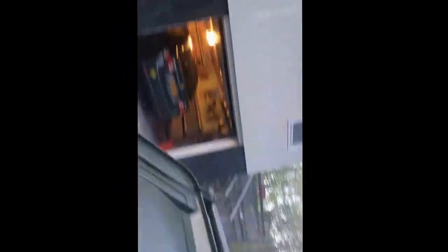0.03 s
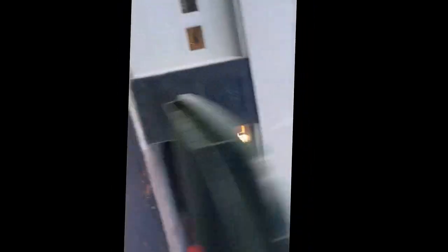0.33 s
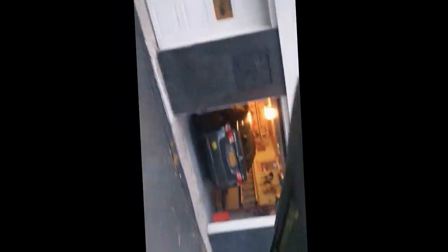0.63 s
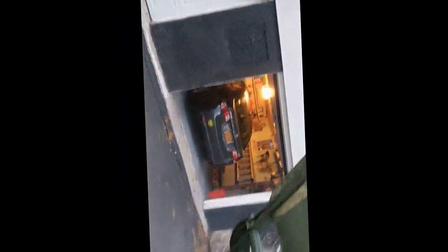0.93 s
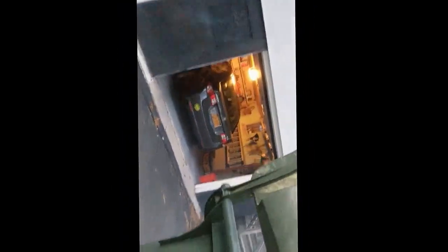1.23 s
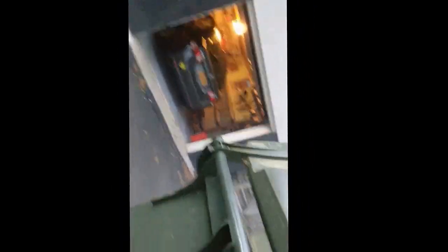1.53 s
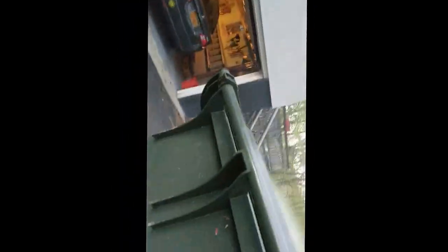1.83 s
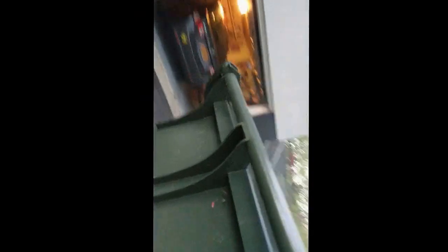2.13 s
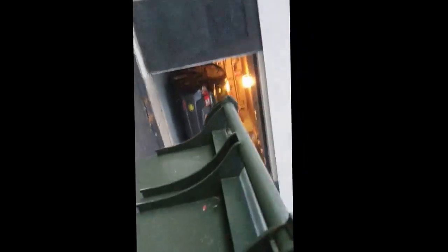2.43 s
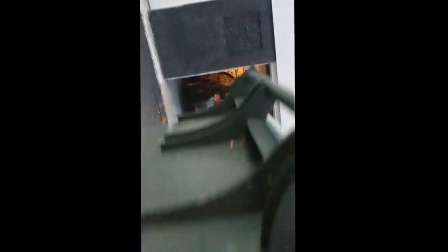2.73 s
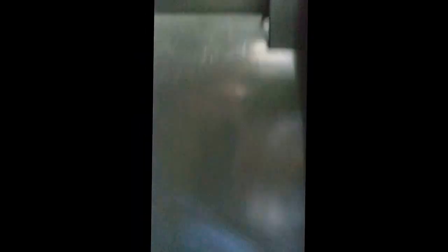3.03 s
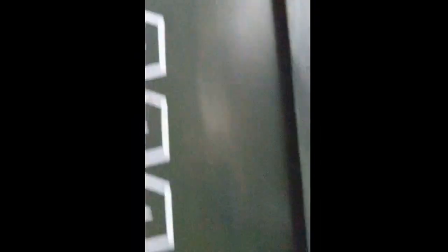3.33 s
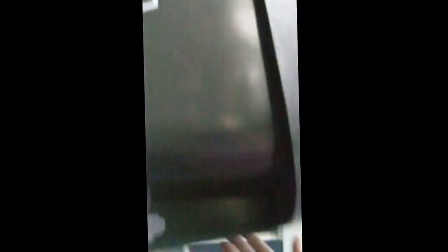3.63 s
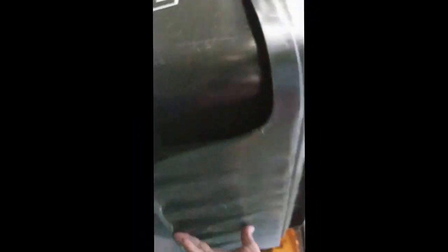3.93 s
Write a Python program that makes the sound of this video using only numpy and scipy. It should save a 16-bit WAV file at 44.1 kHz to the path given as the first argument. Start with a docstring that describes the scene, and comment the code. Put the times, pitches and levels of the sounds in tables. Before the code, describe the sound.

A plastic wheelie bin rolls with a faint low murmur, fading by 1 second amid soft hand rubs and ticks. At about 1.9 seconds its lid slams loudly, clattering and booming with a short echo; a small hollow knock follows at 2.4. From 2.7 until 4 seconds the bin is hauled over rough paving, close by, with a hollow rumble, gritty wheels, rattling jolts and sharp clicks around 3.3.

```python
"""A low murmur of slow wheels comes first: a plastic wheelie bin rolls to a stop in front of a shed.
Its lid slams and clatters, each impact exciting the lid's modes; the air inside booms, the walls
reflect the sound, and one small knock follows. Then the bin is hauled over rough paving: stones
drive the resonances of the hollow body, bumps jolt the axle and a side panel groans.
A hand rubs and ticks on the plastic, over faint outdoor air."""
import sys
import numpy as np
from scipy import signal
from scipy.fft import rfft, irfft, next_fast_len
from scipy.io import wavfile

SR = 44100
rng = np.random.default_rng(int(sys.argv[2]) if len(sys.argv) > 2 else 0)


def persist_wave(psi):
    """Save psi, clipped to +-1, as 16-bit WAV."""
    counts = np.round(np.clip(psi, -1, 1) * 32767).astype(np.int16)
    wavfile.write(sys.argv[1], SR, np.atleast_2d(counts).T)


N = 176400

STONES_PER_S, STONE_SPREAD_DB = 980, 2.5
# bright edge of a jolt or a crackle (frequency [Hz], gain [dB])
EDGE_SPECTRUM = [(500, 7), (2000, 13), (5800, -0.5), (8000, -11), (15000, -17)]


def lid_slam(body_db=-3, modes_db=-8, crack_db=-3, cavity_t60=0.66, cavity_rise_s=0.14):
    """Impact excitation: each contact with the rim cracks and rings; the lid pumps the air inside."""
    # (time [s], relative ring level [dB], relative crack level [dB])
    contacts = [(1.9101, -20.5, -20), (1.9217, -10.5, -3.5), (1.9302, -20.5, -2.5), (1.936, -19.5, 6),
                (1.9544, -17.5, -4), (1.978, -16, -11), (1.993, -18.5, 0), (2.008, -14, -10),
                (2.038, -15, -8.5), (2.0523, -12.5, -0.5)]
    # dense ring of the lid (frequency [Hz], gain [dB])
    body_spectrum = [(25, -63), (45, 1), (70, 1.5), (120, 4), (240, 3), (720, -1.5), (1100, -1.5),
                     (1520, -6.5), (1850, 2), (2120, -1.5), (2400, -8), (3200, -15.5), (4800, -22),
                     (12100, -34), (15500, -69)]
    # its decay, with the walls' answer (frequency [Hz], t60 [s])
    body_decay = [(70, 0.88), (500, 0.49), (2000, 0.51), (4500, 0.63), (8000, 0.086), (14000, 0.16)]
    # crack of a contact (frequency [Hz], gain [dB])
    crack_spectrum = [(100, -8.5), (1000, 12), (2000, 0.5), (5000, -0.5), (8500, -10.5), (12000, -13),
                      (15500, -20)]
    # modes of the enclosed air (frequency [Hz], level [dB])
    cavity_modes = [(67.5, -5), (92.7, -7)]
    body, tones, t = np.zeros(N), np.zeros(N), np.arange(SR) / SR
    for s, db, _ in contacts:
        add(body, s, amp(db) * dense_ring(body_decay))
        add(tones, s, amp(db + modes_db) * lid_ring())
    cavity = sum(amp(db) * np.sin(2 * np.pi * hz * t) for hz, db in cavity_modes)
    swell = amp(-60 * t / cavity_t60) * (1 - np.exp(-t / cavity_rise_s))
    add(tones, contacts[1][0], swell * cavity)
    cracks = coloured(bursts([(s, db) for s, _, db in contacts], t60=0.01), crack_spectrum)
    return amp(body_db) * coloured(body, body_spectrum) + tones + amp(crack_db) * cracks


def lid_ring(detune=0.0224, rise_s=0.0005):
    """Free vibration: a sum of damped modes, which shift from blow to blow as the lid is soft."""
    # (frequency [Hz], relative level [dB], t60 [s])
    lid_modes = [(645, -5, 0.09), (861, -19, 0.6), (1092, -4, 0.08), (1370, -5, 0.053), (1626, -23, 0.43),
                 (1860, -21, 0.45), (2074, -20, 0.46), (3144, -24, 0.42)]
    t = np.arange(SR // 2) / SR
    out = np.zeros(len(t))
    for hz, db, t60 in lid_modes:
        decay = amp(db + rng.normal(0, 1) - 60 * t / t60)
        shifted_hz = hz * (1 + detune * rng.normal())
        out += decay * np.sin(2 * np.pi * shifted_hz * t + rng.uniform(0, np.pi))
    return (1 - np.exp(-(t / rise_s) ** 2)) * out


def hauling(boom_db=-1, walls_db=-2, grit_db=-1, crackle_db=-20.5):
    """Forced vibration: stones shake the hollow, the panels and the wheels; flexing plastic crackles."""
    # relative levels (time [s], bass [dB], low mids [dB], wheel grit [dB])
    haul_levels = [(2.62, -45, -76, -74), (2.70, -26.5, -33.5, -41.5), (2.78, -23, -31, -44),
                   (2.85, -25, -24, -36.5), (2.95, -18, -20.5, -25), (3.15, -21, -19, -29),
                   (3.3, -20, -20.5, -19.5), (3.4, -18, -21, -24.5), (3.75, -19, -21, -29),
                   (4.0, -21, -25.5, -29)]
    # hollow of the bin (frequency [Hz], gain [dB])
    boom_spectrum = [(20, -19), (36, -30), (46, -6), (54, 1), (63, -4.5), (84, -4), (130, -13), (300, -56),
                     (1500, -100)]
    # wheels on grit (frequency [Hz], gain [dB])
    grit_spectrum = [(150, -10.5), (350, -5.5), (850, -4), (1250, -5.5), (1600, -14.5), (2150, -15),
                     (2600, -24), (5500, -34), (8500, -39.5), (15000, -39.5)]
    bass, mids, wheels = curves(haul_levels)
    road = impacts(STONES_PER_S, STONE_SPREAD_DB)
    boom = amp(bass + boom_db) * unit(coloured(road, boom_spectrum))
    walls = amp(mids + walls_db) * wall_panels(road)
    crunch = unit(coloured(clumped_noise(per_s=160, life_s=0.0067, floor=0.32), grit_spectrum))
    crunch += amp(crackle_db) * unit(coloured(impacts(per_s=26, spread_db=5), EDGE_SPECTRUM))
    onset = gate(haul_levels[0][0], length=2, rise_s=0.018, fall_s=1)
    return onset * (boom + walls + amp(wheels + grit_db) * crunch)


def wall_panels(force):
    """Modal superposition: the bin's walls respond as damped resonators of alternating sign."""
    # (frequency [Hz], bandwidth [Hz], relative level [dB])
    panel_modes = [(185.2, 12.4, 0.5), (217, 18.6, -0.5), (247.7, 30, -2.5), (302.5, 25, -5.5),
                   (334.5, 12.5, -5.5), (474, 170, -15)]
    # (frequency [Hz], gain [dB])
    panel_colour = [(70, -18), (170, -2), (450, -0.5), (1500, -20.5), (8000, -44)]

    def response(f):
        return sum((-1) ** k * amp(db) * 1j * f * width / (hz * hz - f * f + 1j * f * width)
                   for k, (hz, width, db) in enumerate(panel_modes))
    return unit(coloured(filtered(force, response), panel_colour))


def jolts(body_db=-9, edge_db=-13, push_db=19):
    """Shock excitation: a bump is one sharp push and a rattle of wheels on the axle; the body thuds."""
    # (time [s], relative level [dB], treble offset [dB])
    shocks = [(0.121, -49, -12), (2.721, -20, -25), (2.815, -20, -12), (2.877, -22.5, 3), (2.908, -19, -7),
              (2.941, -23, 0), (3.052, -20.5, 0), (3.143, -18, 1), (3.187, -9, -21), (3.226, -7, -5),
              (3.294, -7.5, 0.5), (3.366, -9, -7), (3.444, -14, 8), (3.467, -7.5, -7), (3.575, -12.5, -7),
              (3.595, -18, 4), (3.670, -12, -0.5), (3.692, -31, 16), (3.742, -29.5, 15),
              (3.7662, -9.5, -16), (3.816, -11.5, 0.5), (3.842, -11, -26), (3.933, -16, -19),
              (3.953, -17, 4), (3.987, -16, 0)]
    # wheels and axle (frequency [Hz], gain [dB])
    rattle_spectrum = [(60, 2.5), (700, 5), (1400, 4), (2100, -5), (2800, -16), (5500, -24), (8500, -42),
                       (15000, -33)]
    # (frequency [Hz], t60 [s])
    rattle_decay = [(200, 0.17), (1500, 0.086), (5000, 0.085), (12000, 0.15)]
    # bumps of the whole body (time [s], level [dB])
    body_bumps = [(.77, -45), (1.921, -10.5), (2.657, -29), (2.687, -22), (2.876, -13.5), (2.958, -14),
                  (3.385, -16)]
    # (frequency [Hz], gain [dB])
    thud_spectrum = [(40, -21), (150, 0.5), (210, 1.5), (300, -2.5), (500, -7), (1000, -43), (4000, -55)]
    rattle = np.zeros(N)
    for s, db, _ in shocks:
        add(rattle, s, amp(db) * dense_ring(rattle_decay))
        add(rattle, s, amp([db + push_db]))  # the push: a single impulse
    edges = bursts([(s, db + treble) for s, db, treble in shocks], t60=0.031)
    edges = amp(edge_db) * coloured(edges, EDGE_SPECTRUM)
    thuds = coloured(bursts(body_bumps, t60=0.065), thud_spectrum)
    return thuds + amp(body_db) * coloured(rattle, rattle_spectrum) + edges


def lid_knock(time_s=2.378, crack_db=-23, modes_db=-21, rim_t60=0.25):
    """Contact damping: the lid drops once more and the rim cuts its ring to a hollow tock."""
    # (frequency [Hz], gain [dB])
    knock_spectrum = [(480, -25), (640, -10.5), (900, -0.5), (1100, 2), (1400, -5), (2100, -3),
                      (2600, -18.5), (3100, -12), (4000, -37), (12000, -71)]
    out = coloured(bursts([(time_s, crack_db)], t60=0.079), knock_spectrum)
    tock = lid_ring()
    rim_damping = amp(-60 * np.arange(len(tock)) / SR / rim_t60)
    add(out, time_s, amp(modes_db) * tock * rim_damping)
    return out


def panel_groan(hz=185, width_hz=18):
    """Narrow-band resonance: under load the big side panel swells on its lowest note and wavers."""
    # (start [s], length [s], level [dB])
    swells = [(3.26, 0.14, -22.5), (3.68, 0.088, -28)]
    narrow = unit(filtered(rng.standard_normal(N), lambda f: np.exp(-((f - hz) / width_hz) ** 2)))
    note = unit(np.cos(np.angle(signal.hilbert(narrow))))  # steady amplitude, wandering pitch
    return note * sum(amp(db) * gate(s, length, rise_s=0.03, fall_s=0.03) for s, length, db in swells)


def slow_roll():
    """Roughness excitation: the paving under slowly turning wheels makes the bin murmur."""
    # (time [s], level [dB])
    roll_levels = [(0, -36), (.15, -33.5), (.35, -39), (.58, -48), (.66, -49), (.73, -54.5), (.95, -62),
                   (1.15, -52.5), (1.35, -54.5), (1.68, -47.5), (1.8, -38.5), (2.3, -49), (2.6, -39),
                   (2.75, -43)]
    # (frequency [Hz], gain [dB])
    roll_spectrum = [(25, -28), (45, -1.5), (84, 6.5), (115, -5), (190, -10), (225, -5), (300, -13),
                     (1000, -27.5), (2200, -38.5), (15000, -66)]
    level_db, = curves(roll_levels)
    return amp(level_db) * unit(coloured(impacts(STONES_PER_S, STONE_SPREAD_DB), roll_spectrum))


def hand_rubs():
    """Sliding friction: a hand on the plastic makes a hiss and a lower scrape."""
    # (start [s], length [s], hiss level [dB], scrape level [dB])
    strokes = [(0.107, 0.025, -66, -61), (0.556, 0.29, -63.5, -65), (1.527, 0.12, -59, -52.5),
               (2.243, 0.19, -52, -80), (2.47, 0.13, -60.5, -64), (2.722, 0.018, -60, -40.5),
               (2.808, 0.021, -53.5, -38), (3.272, 0.013, -35.5, -25.5), (3.36, 0.314, -48.5, -47),
               (3.873, 0.037, -41, -40)]
    # (frequency [Hz], gain [dB])
    hiss_spectrum = [(1000, -24), (5000, 0.5), (9000, -4.5), (13500, 2), (15800, -15)]
    # (frequency [Hz], gain [dB])
    scrape_spectrum = [(200, -6), (900, 13), (2200, 10.5), (4500, -4), (12000, -23)]
    hiss = coloured(clumped_noise(per_s=430, life_s=0.0044, floor=0.17), hiss_spectrum)
    scrape = coloured(clumped_noise(per_s=640, life_s=0.012, floor=0.15), scrape_spectrum)
    return sum(gate(s, length, rise_s=0.012, fall_s=0.028) * (amp(hiss_db) * hiss + amp(low_db) * scrape)
               for s, length, hiss_db, low_db in strokes)


def handle_ticks(tick_db=-5):
    """Broadband transients: the handle and the stiff plastic tick, and the grip clicks close by."""
    # (time [s], relative level [dB])
    light_ticks = [(.613, -38.5), (.7048, -41.5), (.7706, -43), (.9842, -43), (1.0224, -45),
                   (1.5413, -37.5), (1.6296, -36.5), (1.76, -43), (2.611, -40), (2.963, -33), (3.1862, -25),
                   (3.5655, -26), (3.8025, -32)]
    # (frequency [Hz], gain [dB])
    tick_spectrum = [(200, 14), (1500, 4), (5500, 5), (10000, -1), (15000, -9)]
    # (time [s], level [dB])
    sharp_clicks = [(3.2252, -16), (3.281, -15), (3.2948, -10), (3.3015, -17.5), (3.354, -19),
                    (3.368, -18.5)]
    # (frequency [Hz], gain [dB])
    click_spectrum = [(500, -6), (5000, -12), (11000, -21.5), (12800, -6), (14100, -5.5), (15700, -7)]
    ticks = amp(tick_db) * coloured(bursts(light_ticks, t60=0.022), tick_spectrum)
    return ticks + coloured(bursts(sharp_clicks, t60=0.024), click_spectrum)


def shed_echo(x, delay_s=0.012):
    """Reverberation: the shed and the walls around return a delayed, diffuse tail."""
    # (frequency [Hz], t60 [s])
    echo_decay = [(150, 0.77), (800, 0.16), (2000, 0.52), (5000, 0.44), (12000, 0.33)]
    tail = dense_ring(echo_decay)
    impulse_response = np.pad(tail / np.linalg.norm(tail), (round(delay_s * SR), 0))
    return signal.fftconvolve(x, impulse_response)[:N]


def outdoor_air(level_db=-55):
    """Stationary noise: a faint outdoor background, strongest in the bass."""
    # (frequency [Hz], gain [dB])
    air_spectrum = [(25, -17), (96, -3.5), (193, -20.5), (450, -11), (600, -15.5), (1380, -18),
                    (1710, -22.5), (15500, -38.5)]
    return amp(level_db) * coloured(rng.standard_normal(N), air_spectrum)


def impacts(per_s, spread_db):
    """Poisson process: impulses of random time, size and sign."""
    hit = rng.random(N) < per_s / SR
    size = amp(spread_db * np.clip(rng.standard_normal(N), -2, 2))
    return unit(hit * size * rng.choice([-1, 1], N))


def clumped_noise(per_s, life_s, floor):
    """Amplitude modulation: noise power comes in small decaying clumps over a steady floor."""
    decay = np.exp(-np.arange(SR // 10) / SR / life_s)
    power = np.abs(signal.fftconvolve(impacts(per_s, spread_db=2.5) ** 2, decay)[:N])
    return unit(np.sqrt(power / power.mean() + floor) * rng.standard_normal(N))


def dense_ring(decay):
    """Frequency-dependent damping: each band of a noise dies at its own rate."""
    hz, t, bands = signal.stft(rng.standard_normal(SR), SR, nperseg=128)
    damping = amp(-60 * t / along(decay, hz)[:, None])
    return signal.istft(bands * damping, SR, nperseg=128)[1]


def bursts(rows, t60):
    """Exponentially decaying noise at each (time [s], level [dB])."""
    out, t = np.zeros(N), np.arange(SR // 10) / SR
    for s, db in rows:
        add(out, s, amp(db) * amp(-60 * t / t60) * rng.standard_normal(len(t)))
    return out


def gate(start, length, rise_s, fall_s):
    """Envelope: linear rise, hold, exponential fall."""
    t = np.arange(N) / SR
    return np.clip((t - start) / rise_s, 0, 1) * np.exp(-np.maximum(t - start - length, 0) / fall_s)


def coloured(x, spectrum):
    """Minimum-phase filter of unit power gain, shaped by (frequency [Hz], gain [dB]) points."""
    def response(hz):
        cepstrum = irfft(np.log(unit(amp(along(spectrum, hz)))))
        half = len(cepstrum) // 2
        causal = np.r_[cepstrum[0], 2 * cepstrum[1:half], np.zeros(half)]
        return np.exp(rfft(causal))
    return filtered(x, response)


def filtered(x, response):
    """Linear filtering: the spectrum of x times a frequency response."""
    size = 2 * next_fast_len(N * 3 // 4)
    return irfft(rfft(x, size) * response(np.fft.rfftfreq(size, 1 / SR)), size)[:N]


def along(points, hz):
    """Interpolation on a logarithmic frequency axis."""
    freqs, values = np.transpose(points)
    return np.interp(np.log(hz + 1), np.log(freqs + 1), values)


def curves(rows):
    """Linear interpolation in time of each column after the first."""
    times, *columns = np.transpose(rows)
    return [np.interp(np.arange(N) / SR, times, column) for column in columns]


def add(track, s, sound):
    """Superpose a sound at time s."""
    i = round(s * SR)
    track[i:i + len(sound)] += sound[:N - i]


def amp(db):
    """Decibels to amplitude."""
    return 10 ** (np.asarray(db) / 20)


def unit(x):
    """Normalise to rms 1."""
    return x / np.sqrt(np.mean(x ** 2) + 1e-20)


def scene(slam_wet_db=-9, knock_wet_db=-6, jolt_wet_db=-9):
    """Superposition of all sources, the echoes of the impacts and the outdoor air, in mono."""
    slam, knock, bumps = lid_slam(), lid_knock(), jolts()
    echo = shed_echo(amp(slam_wet_db) * slam + amp(knock_wet_db) * knock + amp(jolt_wet_db) * bumps)
    air = outdoor_air()
    rolling = slow_roll() + hauling() + panel_groan()
    handling = hand_rubs() + handle_ticks()
    return (slam + knock + bumps + echo + rolling + handling + air)[None]


def record(dry, ceiling=0.85, top_hz=15900):
    """Soft saturation rounds the highest peaks; a sharp low-pass limits the band."""
    rounded = dry[0] / (1 + np.abs(dry[0] / ceiling) ** 6) ** (1 / 6)
    return filtered(rounded, lambda hz: hz < top_hz)[None]


dry = scene()
out = record(dry)
persist_wave(out)
```